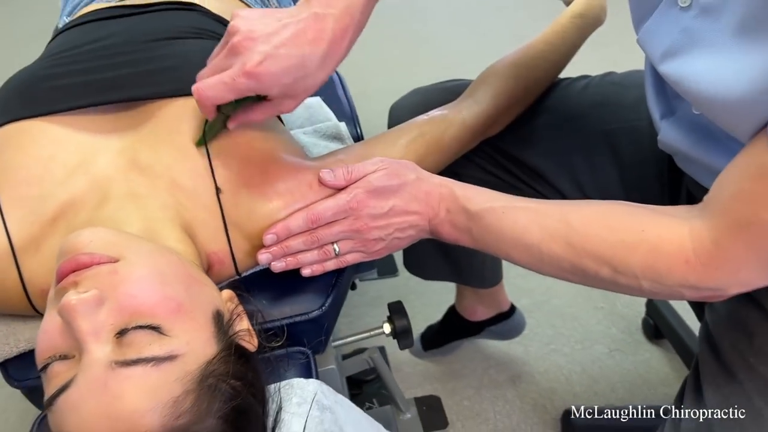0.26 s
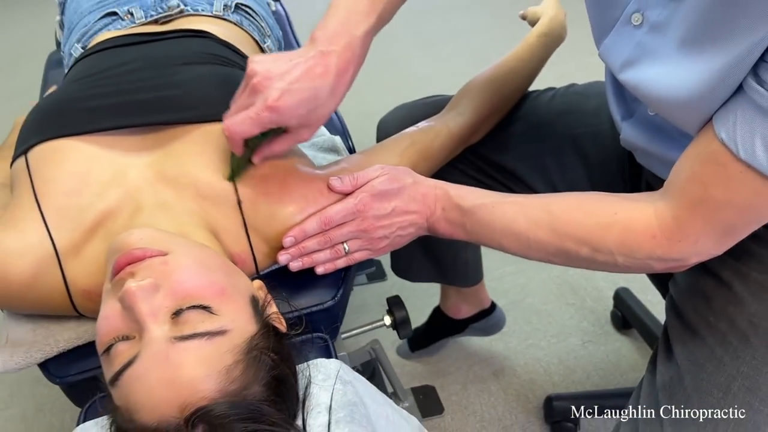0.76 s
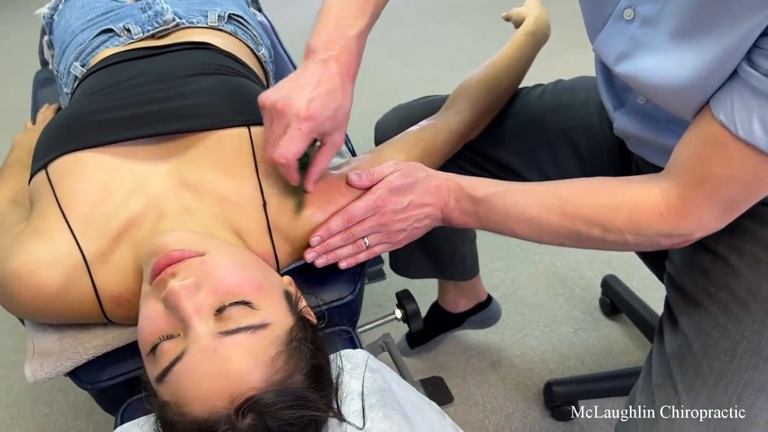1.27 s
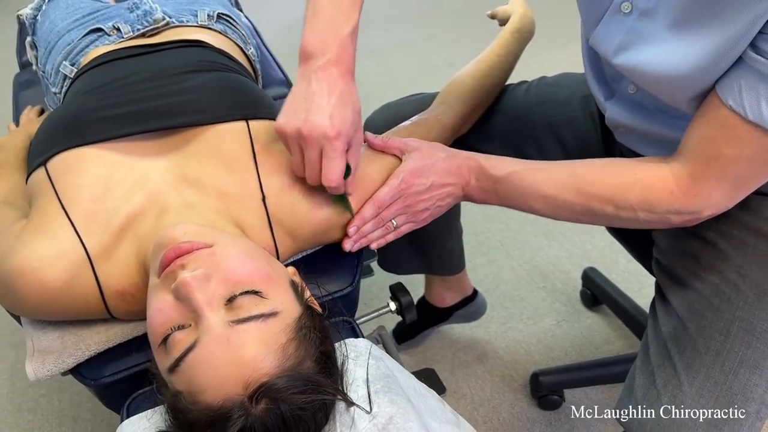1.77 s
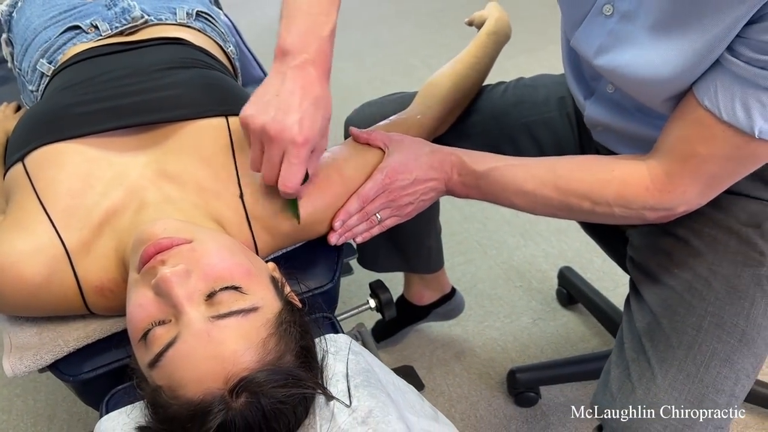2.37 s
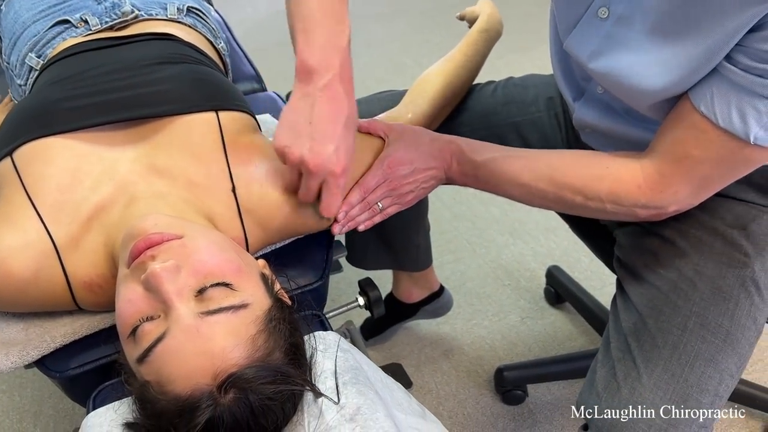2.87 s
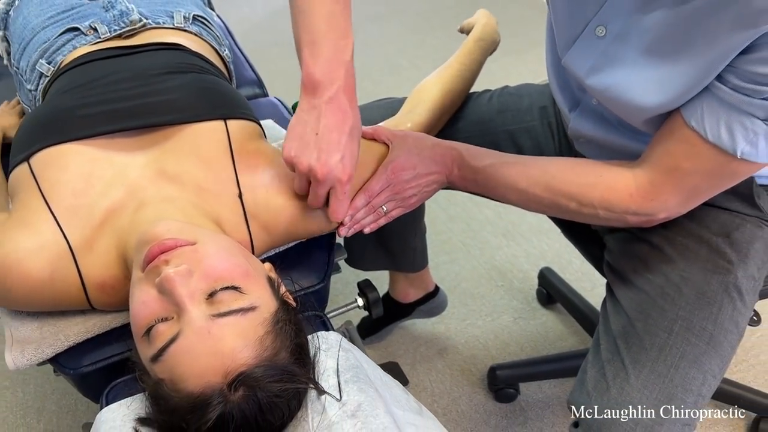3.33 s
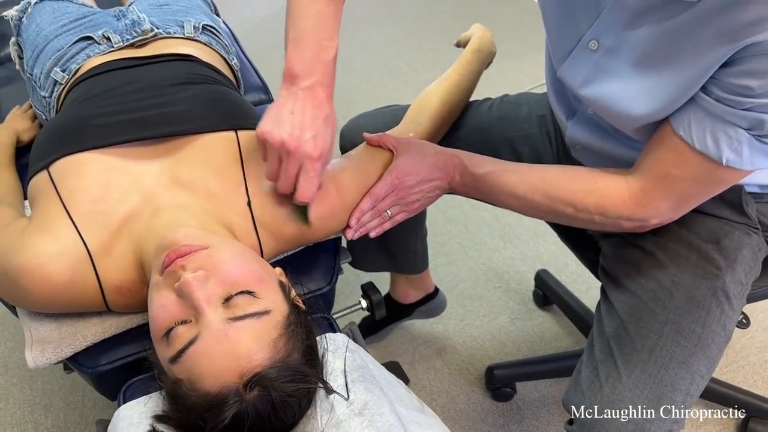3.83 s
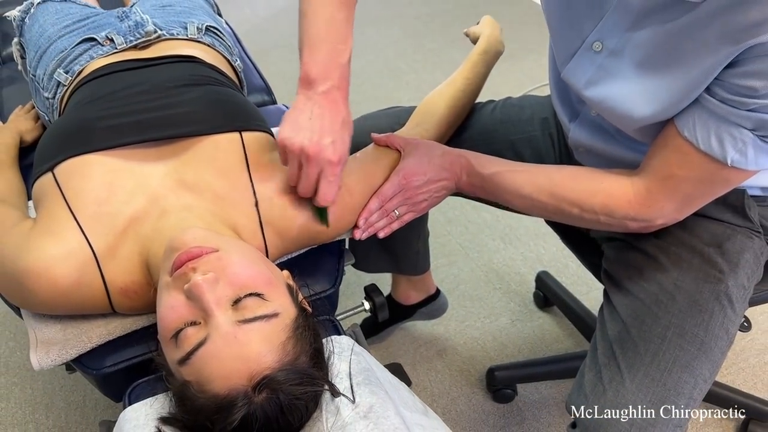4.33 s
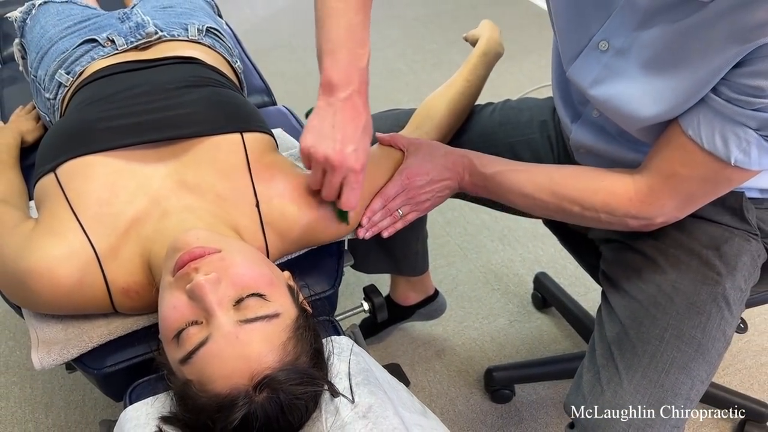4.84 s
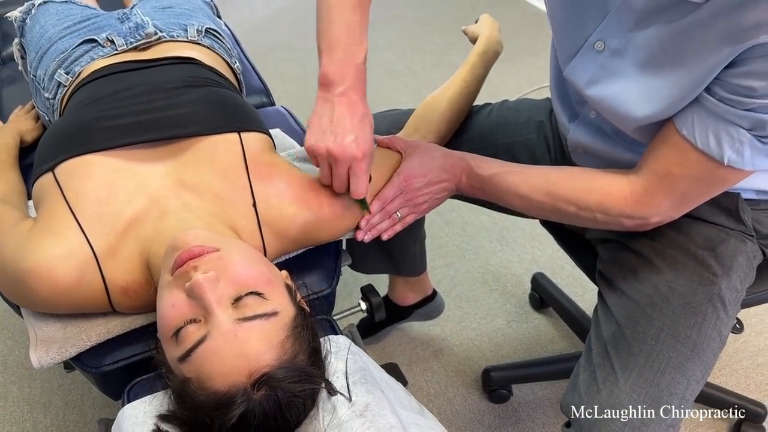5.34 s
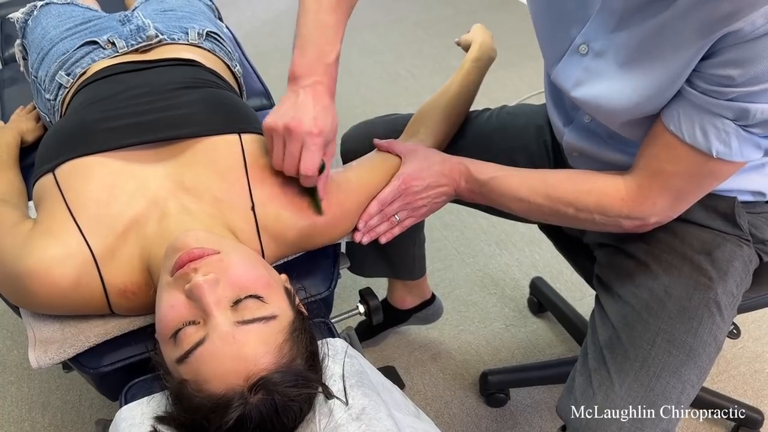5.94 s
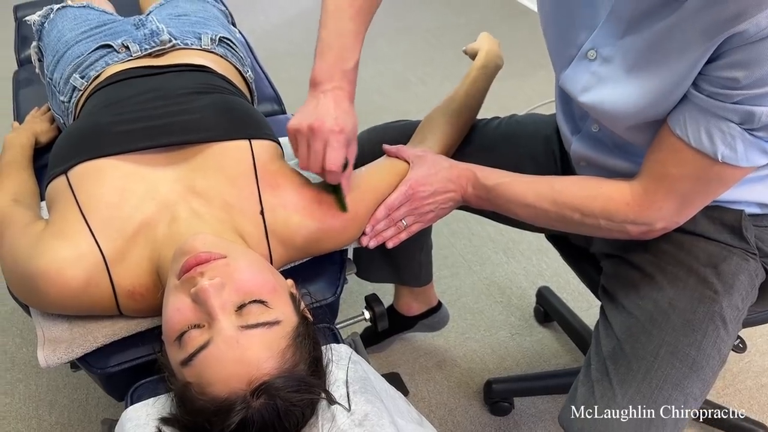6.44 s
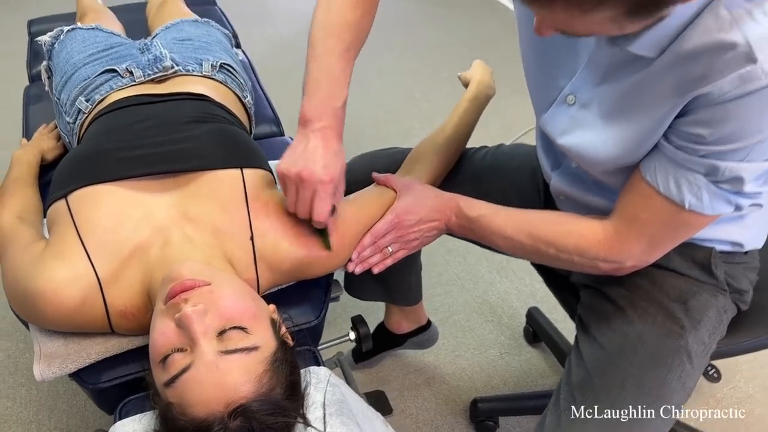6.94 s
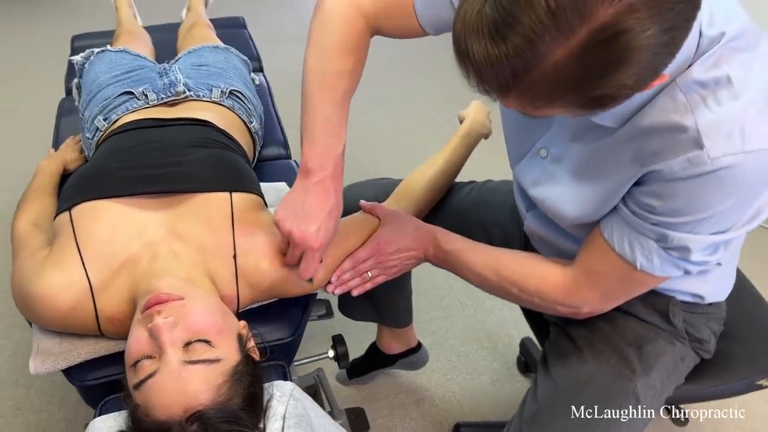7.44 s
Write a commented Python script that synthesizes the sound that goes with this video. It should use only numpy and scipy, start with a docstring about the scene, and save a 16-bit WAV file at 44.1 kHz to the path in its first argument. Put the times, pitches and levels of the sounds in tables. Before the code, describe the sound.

A stereo microphone in a small room picks up a hand tool scraping gently over skin, about two and a half strokes a second, beneath a constant low air rumble and electrical hum. One sharp snap stands out early, followed by faint clicks and knocks. A thin, faint squeak and a more distant clack come around the middle. Toward the end, small ticks ring briefly off the walls and cloth rustles softly.

```python
"""Shoulder rub in a treatment room

A stereo microphone in a small room. A hand tool is stroked to and fro over a shoulder; skin and
sleeves rustle softly, with one faint squeak. One sharp snap, a short clack further off and a few
faint ticks and knocks ring briefly off the walls. All around, the ventilation rumbles and its
motor hum beats slowly against the mains hum."""
import sys
import numpy as np
from scipy import signal
from scipy.fft import rfft, irfft
from scipy.io import wavfile
from scipy.ndimage import uniform_filter1d

SR = 44100
rng = np.random.default_rng(int(sys.argv[2]) if len(sys.argv) > 2 else 0)


def inscribe(sig):
    """Save sig as 16-bit PCM at rate SR to the path in sys.argv[1].

    A 1-D sig is mono; a 2-D sig holds one channel per row.
    Samples are clipped to [-1, 1] before scaling.
    """
    pcm = np.round(np.clip(np.atleast_2d(sig).T, -1, 1) * 32767)
    wavfile.write(sys.argv[1], SR, pcm.astype(np.int16))


N = 339570

# strokes of the tool, settling to about 2.5 a second: (peak time [s], rms level [dB], length [s])
STROKES = [(0.241, -53, 0.069), (0.474, -52.5, 0.12), (0.614, -59, 0.14), (0.904, -52, 0.13),
           (1.15, -66, 0.19), (1.55, -69, 0.31), (1.89, -64, .13), (2.31, -63, 0.068), (2.68, -64, 0.1),
           (3.058, -65, 0.078), (3.45, -66, .15), (3.828, -65, 0.085), (4.238, -69, 0.1),
           (4.645, -60.5, 0.051), (5.083, -62, 0.098), (5.5, -63, .2), (5.94, -70, 0.096),
           (6.338, -68, .12), (6.59, -57, 0.13), (6.98, -69, .13), (7.297, -56, 0.041), (7.484, -57, 0.065)]
# bright scrape of the tool's edge: (frequency [Hz], relative level [dB])
SCRAPE_COLOUR = [(300, 1), (900, 0), (1600, 2), (2600, 1.5), (4500, 0.5), (6500, -3), (10500, -2),
                 (13000, -10), (16000, -32)]
# dull drag of the skin: (frequency [Hz], relative level [dB])
DRAG_COLOUR = [(500, -12), (1000, -4), (1500, 0.5), (2100, -10), (3200, -19), (8000, -20), (16000, -40)]
# brushes of the sleeve: (peak time [s], rms level [dB], length [s])
BRUSHES = [(6.66, -63, .18), (6.79, -59.5, 0.16), (7.28, -54.5, 0.17), (7.47, -58.5, 0.2)]
# rustle of the cloth: (frequency [Hz], relative level [dB])
SLEEVE_COLOUR = [(500, -20), (1500, -3), (4000, 0.5), (7000, -4), (11000, -1.5), (16000, -12)]

# Lean is left minus right at the microphone; room is the reflections against the direct tap.
# the snap, then fainter clicks: (time [s], tap level [dB], lean [dB], room [dB])
CLICKS = [(.3287, -2.5, 0, -6), (.484, -37, 0, 1), (.5925, -27.5, 0, -3), (.8958, -31, -2, -8),
          (.9355, -37, -1, -2), (1.393, -44, 3, -2), (5.357, -41, 7, -1), (6.575, -38, 2, 3),
          (6.7922, -32.5, 7, -11), (7.503, -40, -2, -3)]
# resonances of the clicks: (frequency [Hz], width [Hz], gain [dB])
CLICK_MODES = [(840, 480, -20), (1380, 1100, -40), (2400, 290, -26.5), (3100, 150, -27.5), (3820, 310, -17),
               (4960, 1150, -4.5), (7070, 1140, -13), (8700, 890, -15), (10700, 760, -16)]
# thin bright ticks: (time [s], tap level [dB], lean [dB], room [dB])
TICKS = [(5.272, -36, 5, 0.5), (6.636, -42, 0, -5), (7.46, -43, 2, 1)]
# resonances of the ticks: (frequency [Hz], width [Hz], gain [dB])
TICK_MODES = [(2500, 820, -7), (4700, 1200, -4), (8400, 790, -1.5), (11000, 2200, -18)]
# dull knocks: (time [s], tap level [dB], lean [dB], room [dB])
KNOCKS = [(.8958, -29.5, -4, -8), (.9, -36, -2, -13), (1.4138, -38, -5, -3), (1.59, -49, 6, 0),
          (1.6432, -40.5, 4, -2), (2.911, -44, 5, 5), (2.925, -49, 1, -3)]
# resonances of the knocks: (frequency [Hz], width [Hz], gain [dB])
KNOCK_MODES = [(1110, 160, -9.5), (1700, 370, 0.5), (2500, 500, -11)]
# the clack further off, mostly room sound: (time [s], tap level [dB], lean [dB], room [dB])
CLACK = [(3.4577, -33, 8, 11), (3.4608, -35, .5, 8), (3.474, -36.5, 2, 11)]
# resonances of the clack: (frequency [Hz], width [Hz], gain [dB])
CLACK_MODES = [(577, 360, -22), (1110, 99, -18), (2620, 1760, 2), (4900, 3800, 4.5), (7860, 2500, -2),
               (11300, 4000, -14)]

# colour of the reflections: (frequency [Hz], relative level [dB])
ROOM_COLOUR = [(700, 3.5), (1600, 2.5), (4000, 0.5), (9000, 1), (14000, 1.5)]
# reverberation of the room: (frequency [Hz], time to fall 60 dB [s])
ROOM_T60 = [(400, 0.43), (1500, 0.36), (4000, 0.37), (8000, 0.3), (14000, 0.16)]
# bands that die away separately: (edge [Hz])
ROOM_BANDS = [300, 1000, 2000, 3500, 5000, 7000, 9500, 12000, 14000, SR / 2]

# rumble of the ventilation: (frequency [Hz], relative level [dB])
RUMBLE = [(5, 0.5), (22, 1), (34, -1), (52, -1.5), (65, -7), (85, -1), (110, 2), (128, 0), (145, -7),
          (175, -13), (215, -11.5), (280, -12), (400, -17.5), (660, -29)]
# hiss above the rumble: (frequency [Hz], relative level [dB])
HISS = [(660, -29.5), (850, -30), (1100, -35.5), (1500, -40.5), (2000, -40.5), (3000, -42.5), (4500, -43),
        (6500, -44.5), (9500, -44), (13000, -45.5), (16000, -46)]
# resonances of duct and room: (frequency [Hz], width [Hz], lift [dB])
DUCT_MODES = [(193, 6.8, 2), (273.8, 24, 6.5), (320, 8.6, 0.5), (348, 16.7, 5.5), (370, 8.3, -2.5),
              (502, 13, 0), (600, 22, 6.5), (752, 23, 6), (868, 27, 5), (1470, 130, 2.5)]
# how alike the air is on the two sides of the microphone: (frequency [Hz], correlation [0-1])
AIR_LIKENESS = [(25, 0.11), (55, 0.56), (95, 0.64), (125, 0.1), (160, 0.73), (280, 0.57), (420, 0.28),
                (800, 0.48), (1500, 0.14), (4000, 0.045), (12000, 0.025)]
# balance of the air noise: (frequency [Hz], lean [dB])
AIR_LEAN = [(30, -8.5), (60, 16), (120, -6.5), (145, -0.5), (200, 1), (280, -3), (400, -2.5), (500, -1.5),
            (900, -0.5), (1300, 3), (2200, 1), (5000, 1), (9000, 0.5)]
# fan, motor and mains tones: (frequency [Hz])
HUM_HZ = [19.8, 27.26, 29.11, 58.96, 117.48, 120.02, 234.96]
# each of those tones at the microphone: (rms level [dB], lean [dB], left lead [rad])
HUM_AT_MIC = [(-59, -25, 0.2), (-58, -1, -1.5), (-56, 27, -1.4), (-46.5, -1, -1.3), (-42.5, 10, 1.95),
              (-48, 10, 2.5), (-56.5, 2, -1)]


def tool_on_skin(return_delay_s=.205, return_length_s=.13, drag_db=-66.5):
    """The edge scrapes brightly on each stroke; the skin drags dully both ways."""
    pushes = [(s, drag_db, length_s) for s, _, length_s in STROKES]
    returns = [(s + return_delay_s, drag_db, return_length_s) for s, _, _ in STROKES]
    # a faint rubbing goes on between the strokes
    scrape_level = swells(STROKES, rise_share=.46, resting_db=-71)
    drag_level = swells(pushes + returns, rise_share=.46, resting_db=-73)
    scrape = scrape_level * friction(SCRAPE_COLOUR, alike=.59, grain_db=3.5, grain_hz=90)
    drag = drag_level * friction(DRAG_COLOUR, alike=.47, grain_db=2.5, grain_hz=40)
    return scrape + drag


def sleeve():
    """Cloth rustles as the arm shifts."""
    level = swells(BRUSHES, rise_share=.48, resting_db=-82)
    return level * friction(SLEEVE_COLOUR, alike=.39, grain_db=2.5, grain_hz=200)


def squeak(start_s=2.62, length_s=.29, top_hz=3030, sag_hz=170, top_share=.43, level_db=-71):
    """A thin unsteady tone, dead centre, whose pitch arches and sags."""
    progress = np.clip((np.arange(N) / SR - start_s) / length_s, 0, 1)
    arch_hz = top_hz - sag_hz * ((progress - top_share) / (1 - top_share)) ** 2
    hz = arch_hz + 18 * drift(30)
    flutter_db = 2 * drift(25)
    level = np.sqrt(np.abs(np.sin(np.pi * progress))) * from_db(level_db + flutter_db)
    return np.sqrt(2) * level * np.sin(2 * np.pi * np.cumsum(hz) / SR)


def friction(colour, alike, grain_db, grain_hz):
    """Noise of unit rms from sliding surfaces that catch in tiny grains."""
    hz = np.arange(N // 2 + 1) * SR / N
    grains = irfft(noise_pair(alike, N), N) * from_db(grain_db * drift(grain_hz))
    swish = irfft(rfft(grains) * from_db(at_hz(colour, hz)), N)
    return swish / swish.std()


def swells(moves, rise_share, resting_db):
    """Each movement swells to its peak and fades, half as strong at the ends of its length."""
    t = np.arange(0, N, 100) / SR
    power = from_db(resting_db) ** 2
    for peak_s, level_db, length_s in moves:
        side_s = length_s * np.where(t < peak_s, rise_share, 1 - rise_share)
        bell = .5 ** (((t - peak_s) / side_s) ** 2)
        power = power + (from_db(level_db) * bell) ** 2
    return np.interp(np.arange(N) / SR, t, np.sqrt(power))


def contacts(events, modes, band_hz, rough=0):
    """Each contact, a clean tap or a crunch, rings its object and sends reflections round the room."""
    taps = np.zeros((2, N + SR))
    for s, level_db, lean_db, room_db in events:
        touch = rough * crunch()
        touch[:, 0] += 1   # the clean tap
        at_mic = pan(lean_db) * touch + from_db(room_db) * room_response()
        start = round(s * SR)
        taps[:, start:start + SR // 2] += from_db(level_db) * at_mic
    body = sum(from_db(gain_db) * ring(taps[:, :N], hz, width_hz) for hz, width_hz, gain_db in modes)
    # small objects radiate little bass, and the contact time limits the treble
    return signal.sosfilt(signal.butter(5, band_hz, "band", fs=SR, output="sos"), body)


def crunch(decay_s=.0019, alike=.81):
    """A dense burst of tiny impacts, of unit energy."""
    size = SR // 2
    burst = irfft(noise_pair(alike, size), size) * np.exp(-np.arange(size) / SR / decay_s)
    return burst / np.sqrt(np.sum(burst ** 2) / 2)


def ring(taps, hz, width_hz):
    """A unit tap sets a damped sine of height 1 ringing."""
    r, w = np.exp(-np.pi * width_hz / SR), 2 * np.pi * hz / SR
    return signal.lfilter([0, r * np.sin(w)], [1, -2 * r * np.cos(w), r * r], taps + 1e-18)


def room_response(alike=.4, build_s=.001, lumpiness=6, early_boost=.63):
    """Reflections of unit energy at the microphone: uneven, then dense, the treble dying soonest."""
    size = SR // 2
    t, hz = np.arange(size) / SR, np.arange(size // 2 + 1) * SR / size
    lumps = rng.random(size) ** (lumpiness * np.exp(-t / .055))
    lumps = lumps / np.sqrt(uniform_filter1d(lumps ** 2, size=200))
    echoes = irfft(noise_pair(alike, size), size) * lumps
    spectrum = rfft(echoes) * from_db(at_hz(ROOM_COLOUR, hz))
    tail = 0
    for low, high in zip(ROOM_BANDS, ROOM_BANDS[1:]):
        band = irfft(spectrum * (hz >= low) * (hz < high), size)
        tail = tail + band * from_db(-60 * t / at_hz(ROOM_T60, np.sqrt(low * high)))
    # near walls answer first and loudest, then the diffuse field is left
    near_walls = 1 + early_boost * np.exp(-((t - .016) / .014) ** 2)
    tail = tail * (1 - np.exp(-t / build_s)) * near_walls
    return tail / np.sqrt(np.sum(tail ** 2) / 2)


def ventilation(density_db=-57.5):
    """Steady air noise from the duct, lifted at the resonances, fading into hiss."""
    hz = np.arange(N // 2 + 1) * SR / N
    level_db = density_db + np.where(hz < RUMBLE[-1][0], at_hz(RUMBLE, hz), at_hz(HISS, hz))
    for mode_hz, width_hz, lift_db in DUCT_MODES:
        level_db = level_db + lift_db / (1 + (2 * (hz - mode_hz) / width_hz) ** 2)
    spectrum = noise_pair(at_hz(AIR_LIKENESS, hz), N) * from_db(level_db) * pan(at_hz(AIR_LEAN, hz))
    return irfft(spectrum, N) * np.sqrt(SR / 2)


def hum(left_crest_s=.27):
    """The motor slips a little behind the mains, so their tones beat."""
    t = np.arange(N) / SR - left_crest_s
    tones = 0
    for hz, (level_db, lean_db, lead) in zip(HUM_HZ, HUM_AT_MIC):
        tone = np.sqrt(2) * np.cos(2 * np.pi * hz * t - lead * np.array([[0], [1]]))
        tones = tones + tone * pan(lean_db) * from_db(level_db)
    return tones


def from_db(db):
    """Decibels to gain."""
    return 10 ** (np.asarray(db) / 20)


def at_hz(points, hz):
    """Read a table on a log-frequency axis."""
    knots, values = np.transpose(points)
    return np.interp(np.log(np.maximum(hz, 1)), np.log(knots), values)


def pan(lean_db):
    """Left and right gains for a lean."""
    return from_db(np.array([[.5], [-.5]]) * lean_db)


def drift(rate_hz):
    """A random wander of spread 1, mostly slower than the given rate."""
    hz = np.arange(N // 2 + 1) * SR / N
    slow = irfft(rfft(rng.standard_normal(N)) / (1 + (hz / rate_hz) ** 2), N)
    return slow / slow.std()


def noise_pair(alike, size):
    """Spectra of left and right white noise with a given correlation."""
    mid, side = rfft(rng.standard_normal((2, size)))
    return np.sqrt((1 + alike) / 2) * mid + np.sqrt((1 - alike) / 2) * side * [[1], [-1]]


def scene():
    """Rubbing and small contacts over the room tone, as they reach the microphone."""
    clicks = contacts(CLICKS, CLICK_MODES, band_hz=(705, 11700))
    ticks = contacts(TICKS, TICK_MODES, band_hz=(1480, 13500))
    knocks = contacts(KNOCKS, KNOCK_MODES, band_hz=(600, 5000))
    clack = contacts(CLACK, CLACK_MODES, band_hz=(392, 15000), rough=1.5)
    rubbing = tool_on_skin() + sleeve() + squeak()
    return rubbing + clicks + ticks + knocks + clack + ventilation() + hum()


def record(dry):
    """The microphone signal is cut steeply above 15850 Hz."""
    return signal.sosfilt(signal.ellip(12, .1, 80, 15850, fs=SR, output="sos"), dry)


dry = scene()
out = record(dry)
inscribe(out)
```